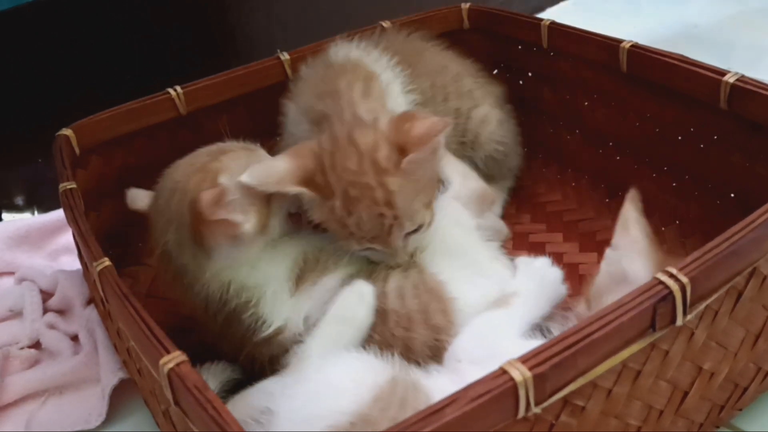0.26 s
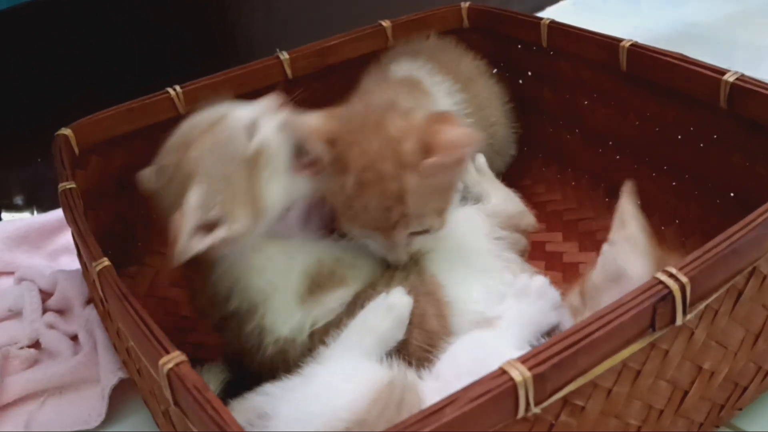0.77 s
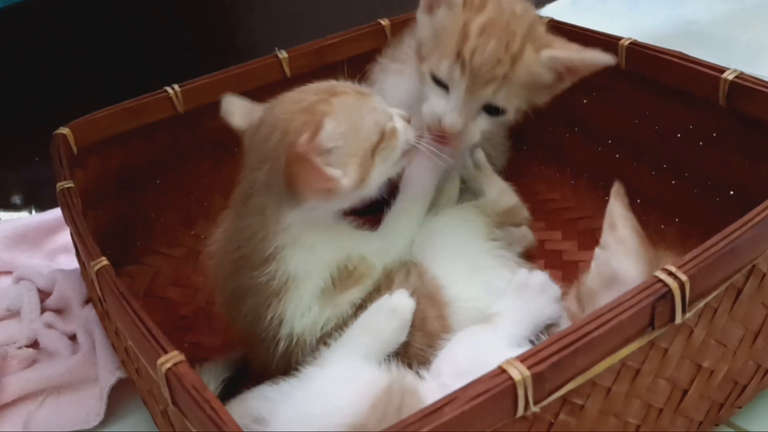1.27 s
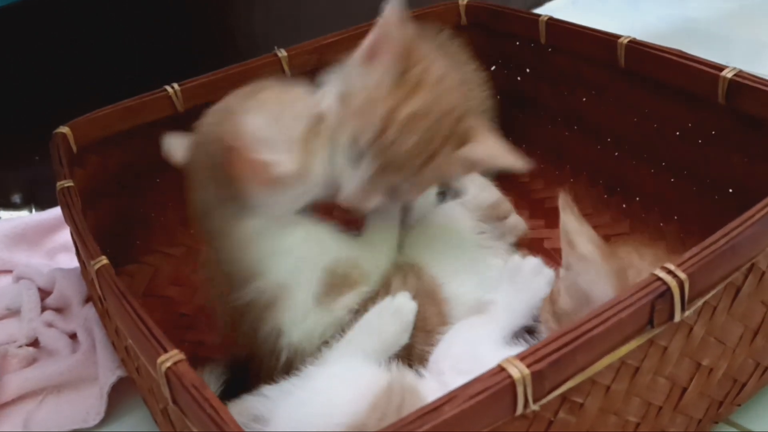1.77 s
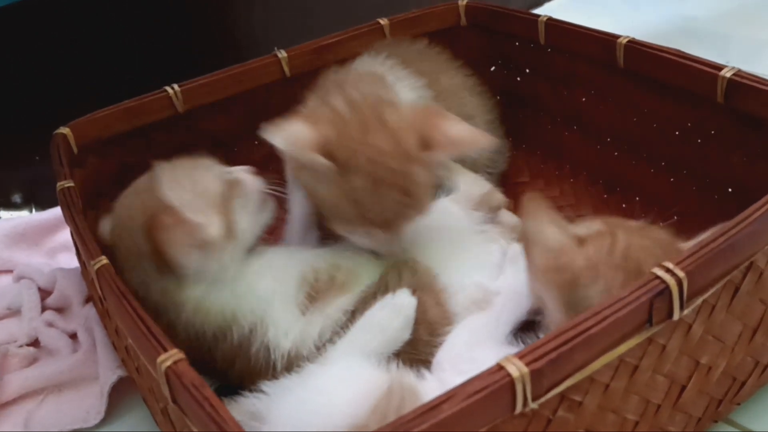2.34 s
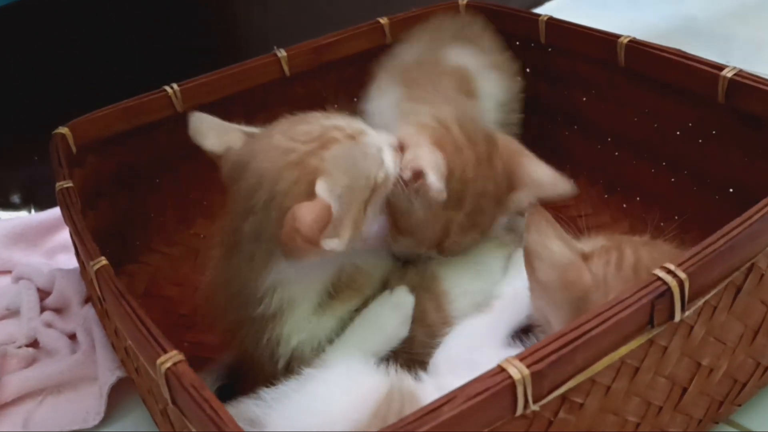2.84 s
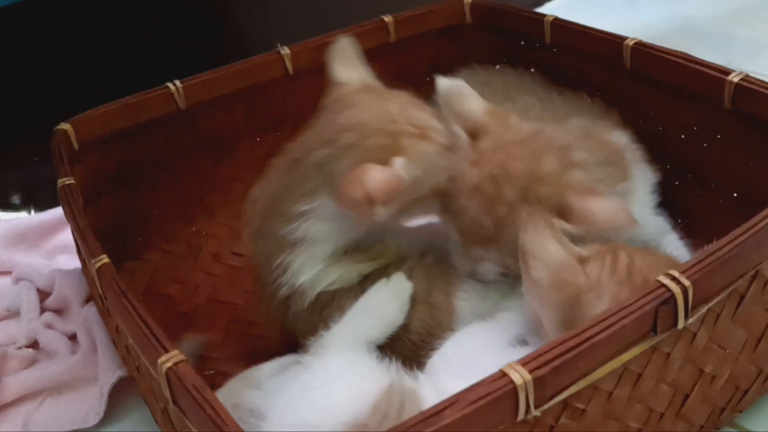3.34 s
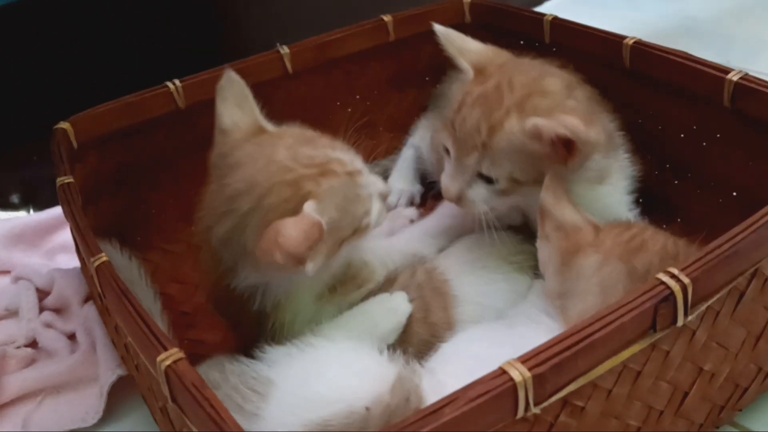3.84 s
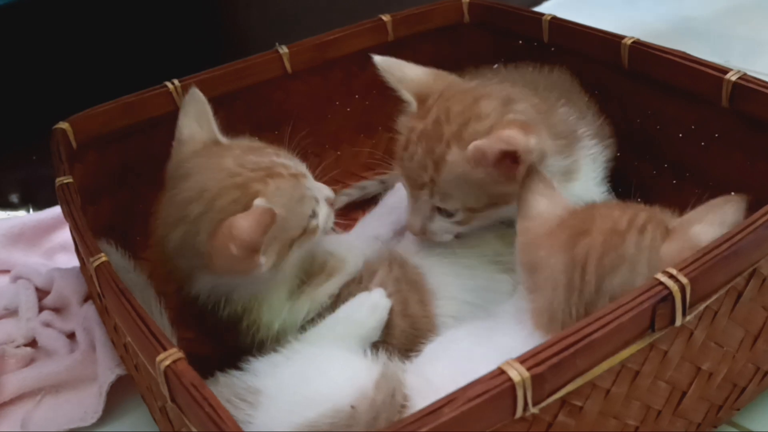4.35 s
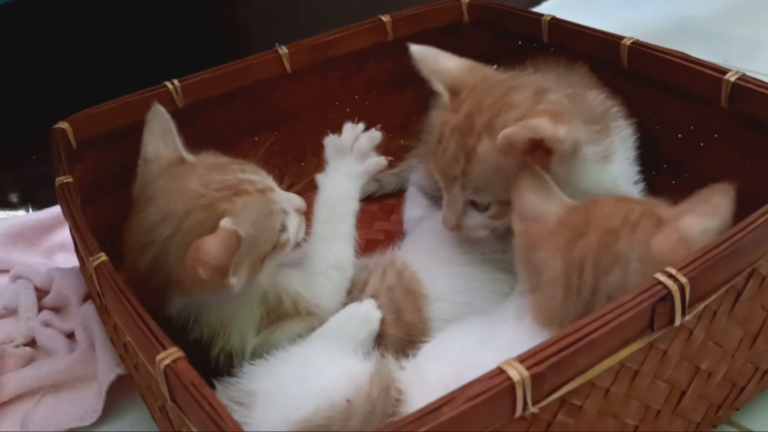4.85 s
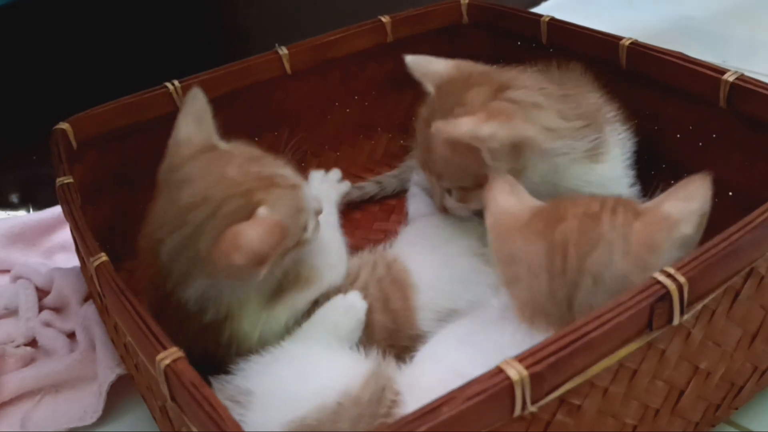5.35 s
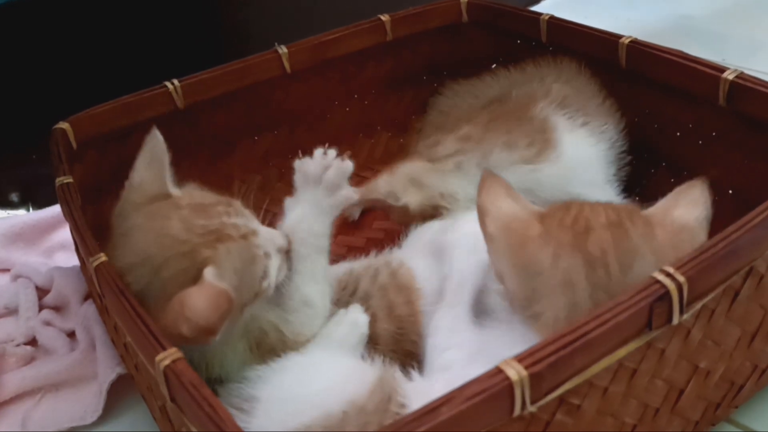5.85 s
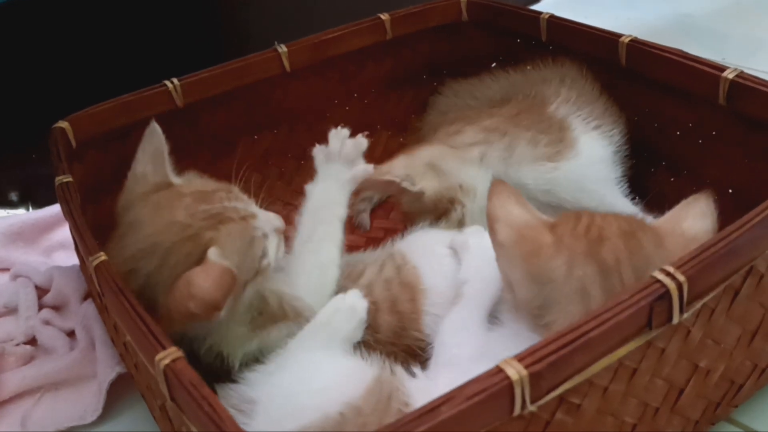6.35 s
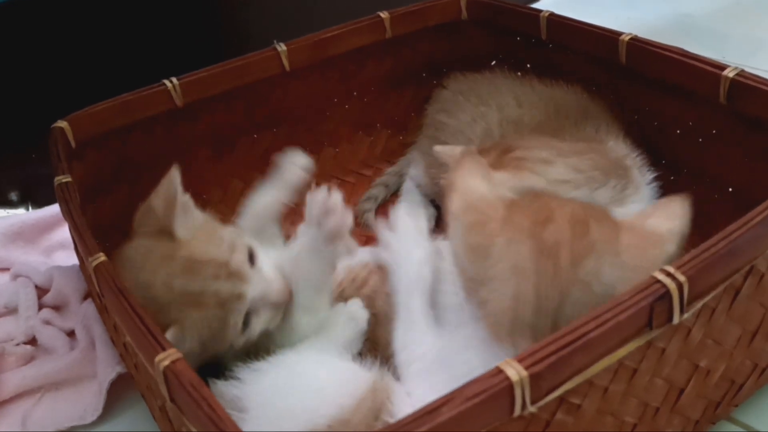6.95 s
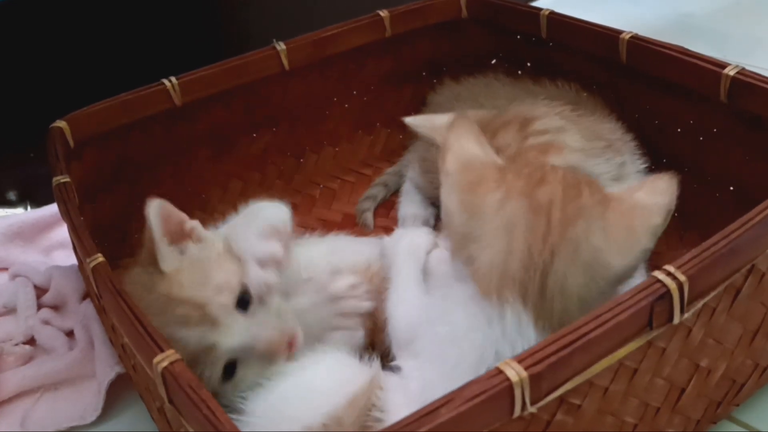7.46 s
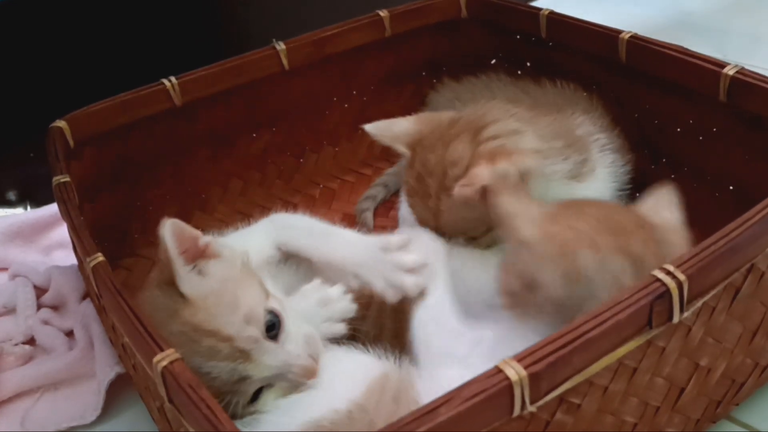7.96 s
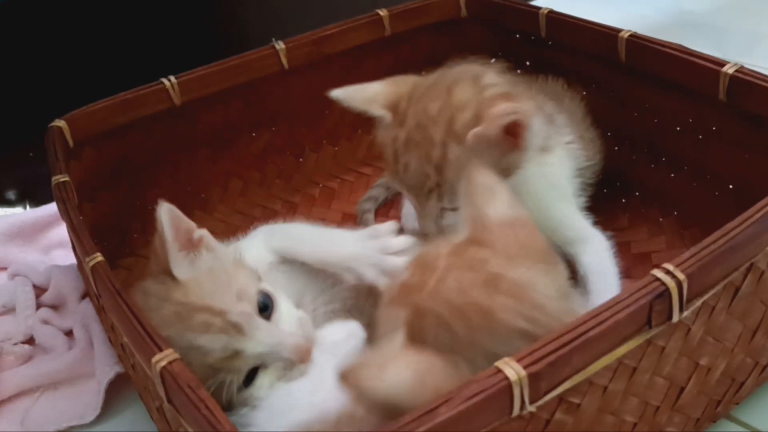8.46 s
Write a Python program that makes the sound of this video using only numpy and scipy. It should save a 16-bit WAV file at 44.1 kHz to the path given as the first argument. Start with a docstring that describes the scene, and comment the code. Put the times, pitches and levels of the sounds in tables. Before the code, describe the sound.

A close stereo indoor pickup of kittens wrestling in a wicker basket, over a steady, slightly fluttering low room rumble and a very faint thin high whine on the right. At about 0.25-0.35 s a small crackle of claws on weave is heard with a light scrape. Faint ticks come near 1.1 s, then a bright, hard snap at 1.86 s, followed by scattered clicks and scratchy drags from 2 to 2.6 s. At 3.1 s comes the loudest event, a tight cluster of sharp cracks with a soft woody paw knock, trailing into small ticks by 3.3 s. It then quiets, with faint clicks around 4.3, 5.4 and 5.8 s. A denser dry crackle and scrape runs from 6.5 to 6.8 s. Light isolated ticks, soft low bumps and faint scrapes continue from 7.1 to 7.9 s, with a last small click at 8.5 s.

```python
"""Kittens in a wicker basket

Kittens wrestle in a wicker basket indoors, close to a camera with two microphone ports.
Claws snap woven strands and drag across them: noise bursts and random slips excite damped modes.
Soft knocks and low swells are decaying low notes, and the room rumbles as filtered noise.
A thin wavering sine whines almost wholly in the right port, which also rings higher than the left."""
import sys
import numpy as np
from scipy import signal
from scipy.fft import rfft, irfft, next_fast_len
from scipy.io import wavfile
from scipy.ndimage import uniform_filter1d

SR = 44100
rng = np.random.default_rng(int(sys.argv[2]) if len(sys.argv) > 2 else 0)


def wrap_up_sound(samples):
    """Save the sound to the file named by the first command line argument, as 16-bit audio."""
    columns = np.atleast_2d(samples).T
    # keep every value between -1 and 1, then stretch to whole-number steps
    tamed = np.clip(columns, -1, 1)
    steps = np.round(tamed * 32767).astype(np.int16)
    wavfile.write(sys.argv[1], SR, steps)


N = 384327


def undb(db):
    """Logarithmic level: decibels to amplitude gain."""
    return 10 ** (np.asarray(db) / 20)


def on_log(hz, table_hz, values):
    """Logarithmic frequency scale: interpolate a spectrum along it."""
    return np.interp(np.log(np.maximum(hz, 1)), np.log(table_hz), values)


def over_time(t, table):
    """Envelope by breakpoints: straight lines between (time, value) rows."""
    return np.interp(t, *np.transpose(table))


def walk(rate):
    """Random modulation: a new normal value every 1 / rate seconds, reached by a straight slew."""
    hold = int(SR / rate)
    steps = np.repeat(rng.standard_normal(N // hold + 1), hold)
    return uniform_filter1d(steps, hold)[:N]


def stroke(t, start, length, rise, fall):
    """Raised-cosine envelope: swell, hold and fade, 0 to 1; rise and fall are shares of the length."""
    progress = (t - start) / length
    ramp = np.clip(np.minimum(progress / rise, (1 - progress) / fall), 0, 1)
    return np.sin(np.pi / 2 * ramp) ** 2


def ring(force, hz, t60):
    """Damped resonance: a two-pole mode whose answer to a unit tick peaks near 1."""
    pole = np.exp(2j * np.pi * hz / SR - np.log(1000) / (t60 * SR))
    return signal.lfilter([0, pole.imag], [1, -2 * pole.real, abs(pole) ** 2], force)


BASKET_LAG_S = 0.000924


def add(out, s, sound):
    """Arrival-time difference: mix a two-port sound in at s, reaching the left port later."""
    for port, lag in enumerate((BASKET_LAG_S, 0)):
        i = int((s + lag) * SR)
        out[port, i:i + sound.shape[1]] += sound[port, :N - i]


# spectrum of the room tone: (frequency [Hz], relative spectral level [dB])
ROOM_SPECTRUM = [(20, -25), (45, -18), (72, 1), (100, -4), (135, -9.5), (168, -8), (240, -29.5), (295, -42),
                 (330, -37.5), (365, -40), (420, -42.5), (560, -51), (670, -47.5), (760, -41), (860, -49),
                 (1400, -52), (2300, -49.5), (3200, -56.5), (7000, -66.5), (16000, -63)]
# likeness of the room tone at the two ports: (frequency [Hz], share of power common to both)
ROOM_LIKENESS = [(100, 0.93), (180, 1), (400, 0.83), (2000, 0.01), (8000, 0.012)]
# deep rumble, octaves centred on 32 to 128 Hz: (time [s], level [dB])
DEEP_RUMBLE = [(0.0, -45.5), (0.05, -40), (0.719, -36.5), (0.77, -54), (0.85, -38), (3.98, -39.5),
               (4.24, -36.5), (4.29, -42.5), (4.92, -38), (5.09, -46), (5.17, -38.5), (6.48, -40),
               (7.16, -38), (7.98, -42), (8.12, -41.5), (8.15, -51.5), (8.3, -39.5), (8.71, -40)]
# upper rumble, octave centred on 256 Hz: (time [s], level against its usual one [dB])
UPPER_RUMBLE = [(0, -0.5), (2.03, 1), (2.3, 7), (2.42, 3.5), (2.52, -4.5), (3.2, 0.5), (3.4, 8),
                (3.54, -2.5), (5.33, -2), (5.94, -2), (6.229, -0.5), (7.39, -2), (7.8, -6.5), (8.71, -2)]
ROOM_DB, LEFT_LAG_S = -38, 0.0012  # usual level; delay of the common room sound at the left port


def room(swell_db=.6, flicker_db=1.2):
    """Partly coherent noise: the bass is common to both ports; each octave swells and flickers alone."""
    t = np.arange(N) / SR
    size = next_fast_len(N)
    hz = np.arange(size // 2 + 1) * SR / size
    common, left, right = rfft(rng.standard_normal((3, size)))
    share = np.clip(on_log(hz, *np.transpose(ROOM_LIKENESS)), 0, 1)
    late = np.exp(-2j * np.pi * hz * LEFT_LAG_S)
    shared = np.sqrt(share) * common * np.array([late, np.ones_like(late)])
    separate = np.sqrt(1 - share) * np.array([left, right])
    air = (shared + separate) * undb(on_log(hz, *np.transpose(ROOM_SPECTRUM)))
    usual = irfft(air, size).std()
    out = np.zeros((2, N))
    for octave in range(5, 15):  # centred on 2 ** octave Hz, cross-fading into its neighbours
        away = np.clip(np.log2(np.maximum(hz, 32)) - octave, -1, 1)
        band = irfft(air * np.cos(np.pi * away / 2) ** 2, size)[:, :N]
        if octave == 8:
            band = band * undb(over_time(t, UPPER_RUMBLE))
        if octave < 8:
            band = band * undb(over_time(t, DEEP_RUMBLE) - ROOM_DB)
        out += band * undb(swell_db * walk(1.28) + flicker_db * walk(11))
    return out * undb(ROOM_DB) / usual


# pitch of the whine before its waver: (time [s], frequency [Hz])
WHINE_PITCH = [(0, 9710), (.6, 9715), (1.6, 9770), (2.2, 9745), (2.7, 9778), (6.5, 9778), (7.0, 9755),
               (7.5, 9825), (8.71, 9818)]
# level of the whine before its flicker: (time [s], level [dB])
WHINE_LEVEL = [(0, -76.5), (.5, -75), (1.1, -78.5), (1.7, -76.5), (2.2, -77.5), (2.7, -76.5), (3.3, -74.5),
               (3.9, -79), (4.5, -78.5), (5.2, -77.5), (5.8, -78.5), (6.3, -80.5), (6.9, -74.5), (7.4, -80),
               (8.0, -74.5), (8.4, -77), (8.71, -82.5)]
# short breaks in the whine: (start [s], length [s])
WHINE_BREAKS = [(1.215, 0.086), (3.482, 0.01), (4.751, 0.047), (5.059, 0.12), (6.035, 0.059),
                (6.343, 0.065), (7.954, 0.043)]


def whine(waver_hz=18, flicker_db=3, swell_db=2.0, left_db=-30, break_db=-35):
    """Frequency and amplitude modulation: a thin unsteady sine, almost all in the right port."""
    t = np.arange(N) / SR
    hz = over_time(t, WHINE_PITCH) + waver_hz * walk(60)
    phase = 2 * np.pi * np.cumsum(hz) / SR
    breaks = sum(stroke(t, s, length, 0.12, 0.16) for s, length in WHINE_BREAKS)
    db = over_time(t, WHINE_LEVEL) + break_db * breaks + swell_db * walk(3.8) + flicker_db * walk(50)
    return undb(db) * np.sin(phase) * undb([[left_db], [0]])


# soft low bumps, the loudest a paw on the basket floor:
# (time [s], level [dB], note [Hz], left minus right [dB])
THUMPS = [(0.298, -57, 323, 9), (1.068, -58, 414, 7), (1.27, -56.5, 337, 14.5), (1.64, -59, 325, 8),
          (1.862, -61, 430, 3), (1.117, -62, 514, -13), (1.924, -58, 517, 6), (2.05, -66, 510, 8),
          (2.166, -62.5, 510, -8), (2.298, -50.5, 643, 1), (2.336, -63, 527, 10), (1.2, -57, 259, 8),
          (2.311, -53, 253, 2), (6.103, -54, 244, 3), (3.068, -52, 774, -7), (3.085, -53, 810, -6),
          (3.1118, -33, 314, 0), (3.113, -39.5, 640, 3), (3.136, -57, 800, -2), (3.35, -60, 302, 2),
          (3.39, -57, 270, -4), (4.194, -61, 950, 3), (4.389, -65, 990, 8), (4.416, -63, 934, 10),
          (5.81, -59.5, 325, 15), (5.975, -58, 341, 21), (6.344, -60, 340, 15), (6.47, -61, 336, 12),
          (6.548, -63, 433, 2), (6.619, -56.5, 390, -7), (6.86, -61, 336, 11), (7.26, -57, 328, 16),
          (7.662, -59, 465, 3), (7.777, -55, 580, 5), (7.92, -64, 522, -12), (8.001, -59, 332, 11),
          (8.15, -60, 320, 11), (8.49, -58, 280, 3), (8.519, -64, 427, -2), (8.62, -72, 430, -3)]
THUMP_T60_S, SWELL_T60_S = 0.064, 0.099  # decay of a knock and of a soft low swell
SLOW_BELOW_HZ, SLOW_RISE_S = 345, 0.012  # soft low swells near 300 Hz start slowly


def thumps(push_s=0.00047, floor_hz=255, floor_db=-6, thud_db=-7, thud_t60_s=0.04):
    """Exponential decay: each bump's own note sounds over a common lower note and a dull broad thud."""
    out, t = np.zeros((2, N)), np.arange(SR // 4) / SR
    dull = signal.butter(2, (230, 700), "band", fs=SR, output="sos")
    for s, db, hz, pan_db in THUMPS:
        notes = np.sin(2 * np.pi * hz * t) + undb(floor_db) * np.sin(2 * np.pi * floor_hz * t)
        thud = signal.sosfilt(dull, rng.standard_normal((2, len(t))))
        thud = thud / thud.std() * undb(thud_db - 60 * t / thud_t60_s)
        if hz < SLOW_BELOW_HZ and db < -45:  # low and soft: a swell
            t60, onset = SWELL_T60_S, 2 * (1 - np.exp(-t / SLOW_RISE_S)) ** 2
        else:
            t60, onset = THUMP_T60_S, 1 - np.exp(-t / push_s)
        bump = (notes * undb(-60 * t / t60) + thud) * onset
        add(out, s, bump * undb([[db + pan_db / 2], [db - pan_db / 2]]))
    return out


# modes of strand tips, fine strands, thick strands, wall and frame, before detuning and paw damping:
# (frequency [Hz], relative level [dB], t60 [s])
TIPS = [(11900, -3, 0.003), (13500, 0, 0.002), (16400, 0, 0.0016)]
FINE = [(9100, -11, 0.003), (9000, 11.5, 0.0024), (10015, 6, 0.0052), (10680, 3.5, 0.0071)]
THICK = [(3470, -8, 0.0067), (4200, 4.5, 0.0053), (4930, -2, 0.0091), (5400, -6, 0.01), (6020, 10, 0.0045),
         (7100, 10, 0.0046)]
WALL = [(1860, -3.5, 0.018), (2050, -7.5, 0.012), (2378, -5, 0.034), (2745, -17, 0.012), (3140, 1, 0.0031)]
FRAME = [(860, 5.1, 0.017), (1100, 2.3, 0.0071), (1300, 15, 0.0055), (1400, 2.4, 0.0065)]
FAMILIES = (TIPS, FINE, THICK, WALL, FRAME)


def basket(force, modes, scatter_db, detune):
    """Modal superposition: one family rings, each spot tuned and facing a little differently."""
    out = 0
    spots = rng.standard_normal((len(modes), 3))
    for (hz, db, t60), (shift, left, right) in zip(modes, spots):
        gain = undb(db + scatter_db * np.array([[left], [right]]))
        out = out + gain * ring(force, hz * (1 + detune * shift), t60)
    return out


# strokes of claws and fur over the weave:
# (start [s], length [s], level [dB], dull part against that level [dB])
DRAGS = [(0.236, 0.14, -72, 2), (0.34, 0.21, -65.5, -17), (0.857, 0.23, -80, -9), (1.062, 0.12, -83, -17),
         (1.852, 0.097, -72, 8.5), (2.036, 0.29, -84, 6), (2.25, 0.27, -74, -0.5), (2.43, 0.14, -56, -14),
         (2.545, 0.14, -75.5, -26), (2.856, 0.36, -68.5, -23), (3.027, 0.082, -54.5, -15),
         (3.081, 0.14, -61, -3.5), (3.223, 0.11, -72.5, 2), (3.516, 0.13, -68, -29),
         (3.575, 0.16, -69, -21), (3.653, 0.08, -73, -22), (3.8, 0.073, -76, -20), (3.838, 0.31, -73, -16),
         (4.28, 0.11, -91, 12), (4.833, 0.35, -86, 5.5), (5.327, 0.25, -79, -22), (5.791, 0.044, -80.5, 26),
         (6.401, 0.085, -90, 18), (6.532, 0.11, -62.5, 3.5), (6.615, 0.11, -70.5, -1.5),
         (6.716, 0.061, -78, -19), (6.797, 0.1, -70.5, -32), (7.12, 0.34, -73.5, -10),
         (7.652, 0.064, -65, -27), (7.687, 0.15, -67, -42), (8.37, 0.15, -76, -22)]
DRAG_RISE, DRAG_FALL = 0.22, 0.55  # shares of a stroke spent swelling and fading


def drags(grains_per_s=2500, grain_db=1.0, flutter_db=3, tips_db=-14, thick_db=1, frame_db=-2, left_db=-2):
    """Stick-slip friction: dense uneven slips ring the paw-damped basket; each part flutters alone."""
    t = np.arange(N) / SR
    level, dull = np.zeros(N), np.zeros(N)
    for s, length, db, dull_db in DRAGS:
        pressure = stroke(t, s, length, DRAG_RISE, DRAG_FALL)
        level += pressure * undb(db)
        dull += pressure * undb(db + dull_db)
    times = rng.random((2, N)) < grains_per_s / SR
    sizes = undb(np.minimum(grain_db, 4) * rng.exponential(size=(2, N))) * rng.standard_normal((2, N))
    slips = np.diff(times * sizes, prepend=0)
    parts = []
    for modes in FAMILIES:
        damped = [(hz, db, t60 / 2) for hz, db, t60 in modes]  # the paw halves the decay
        part = basket(slips, damped, 0, 0)
        parts.append(part / part.std() * undb(flutter_db * walk(60)))
    tips, fine, thick, wall, frame = parts
    bright = level * (fine + undb(tips_db) * tips)
    middle = undb(thick_db) * np.sqrt(level * dull) * thick
    low = dull * (wall + undb(frame_db) * frame)
    return (bright + middle + low) * undb([[left_db], [0]])


TAIL_DB, TAIL_T60_S, TAIL_GRAINS_PER_S = -15.5, 0.13, 2500  # rustle after every snap


def rustle(t, settle_s):
    """Sparse impulse noise: decaying random grains as weave and room settle."""
    grains = (rng.random(len(t)) < TAIL_GRAINS_PER_S / SR) * np.sqrt(SR / TAIL_GRAINS_PER_S)
    tail = rng.standard_normal((2, len(t))) * grains * np.exp(-np.log(1000) * t / TAIL_T60_S)
    return undb(TAIL_DB) * tail * (1 - np.exp(-t / settle_s))


def push(force, size):
    """Inertia: heavier parts feel the crack as a slower push, averaged over size samples."""
    return uniform_filter1d(np.diff(force, prepend=0), size)


def peak_one(x):
    """Peak normalisation: scale the largest excursion to 1."""
    return x / np.abs(x).max()


RASP_DB, RASP_T60_S = -7.5, 0.018  # the settling weave keeps nudging the caught spot


def own_note(t, hz, t60, crack_s, tail):
    """Local resonance: the caught spot sounds a decaying note, with a rasp excited by the rustle."""
    note = np.sin(2 * np.pi * hz * t) * (1 - np.exp(-t / crack_s)) ** 2 * undb(-60 * t / t60)
    return peak_one(note) + undb(RASP_DB) * peak_one(ring(tail, hz, RASP_T60_S))


# claw snaps: (time [s], relative levels of tips, fine strands, thick strands, wall, frame [dB],
#  own notes of strand, wall patch, frame bar [Hz], left minus right [dB], crack decay time [ms])
SNAPS = [(0.234, -59, -63, -70, -53, -62, 4730, 1650, 1500, 10, 1.4),
         (0.254, -59, -55, -51, -38.5, -59, 4200, 1960, 1080, 8, 1.4),
         (0.268, -60, -62, -47, -42, -61, 5000, 1890, 1210, 6, 1.1),
         (0.2756, -63, -51, -53, -52, -49, 4870, 3340, 1230, 3, 0.65),
         (0.2834, -63, -56, -57, -54, -48, 4000, 3330, 1250, 3, 0.95),
         (0.296, -62, -50, -50, -40.5, -40, 4150, 1930, 1080, 6, 1.6),
         (0.3045, -63, -54, -52, -48, -51, 4100, 2280, 1300, 2, 1.3),
         (0.311, -63, -54, -50, -47, -52, 4900, 2250, 1020, 2, 1.3),
         (0.3178, -57, -50, -52, -47, -57, 4000, 2140, 1180, 2, 1.2),
         (0.337, -65, -55, -61, -52, -66, 4100, 2150, 1100, 4, 1.3),
         (1.0817, -65, -47.5, -73, -72, -78, 4100, 2000, 1460, -15, 0.54),
         (1.111, -54, -57, -73, -75, -66, 4200, 2650, 850, -6, 0.93),
         (1.1254, -71, -53, -73, -70, -70, 4010, 1690, 880, -15, 2.2),
         (1.8632, -27, -33, -31.5, -34.5, -38.5, 4600, 1710, 1270, 2.5, 1.7),
         (1.866, -38, -44, -44, -40.5, -37, 4650, 2300, 940, 9.5, 0.7),
         (1.9266, -46, -43, -61, -61, -60, 7490, 2700, 1260, -20, 0.93),
         (1.934, -56, -60, -54, -66, -68, 5700, 2800, 1240, -8, 1.2),
         (2.035, -62, -58, -53, -68, -64, 4800, 2470, 1170, -5, 0.96),
         (2.059, -61, -42, -50, -55, -73, 4650, 2390, 1500, -12, 1),
         (2.0833, -53, -49, -50.5, -60, -73, 6000, 2420, 1500, -8, 0.98),
         (2.109, -62, -50, -60, -67, -68, 5590, 2830, 1010, -10, 1),
         (2.173, -54, -41, -43.5, -52, -68, 4780, 1630, 850, -7, 1.4),
         (2.257, -70, -64, -52, -56, -78, 7400, 1800, 850, -1, 1.1),
         (2.2902, -52, -41.5, -43, -61, -69, 5200, 2800, 1250, -4, 1.3),
         (2.342, -54, -46, -46.5, -52, -66, 7350, 1830, 1450, -7, 1.1),
         (2.345, -48, -44, -50, -47, -66, 5300, 1860, 1500, 3, 1.5),
         (2.393, -54, -45, -43, -53, -66, 5300, 1730, 850, 1, 0.53),
         (2.48, -38, -55, -46, -59, -72, 4700, 2100, 1370, -9, 1.5),
         (2.51, -38, -58, -51, -67, -73, 5960, 2670, 850, -16, 1.3),
         (3.0922, -39, -50, -63, -78, -48, 6290, 1830, 830, -12, 1.2),
         (3.0985, -48, -46, -54, -62, -60, 6000, 2400, 1100, -8, 0.7),
         (3.1086, -22.5, -27.5, -34, -31, -30, 5800, 2340, 1106, 7.5, 0.84),
         (3.1126, -23, -31, -24.5, -36.5, -32, 6020, 3430, 1060, -7, 0.92),
         (3.1265, -35, -40, -38, -43, -56, 4700, 3300, 850, 10, 0.76),
         (3.1313, -44, -50, -29, -42, -56, 4980, 2600, 1100, 3, 0.82),
         (3.239, -62, -49, -46, -49, -70, 7540, 2400, 1380, 5, 1.9),
         (3.2462, -62, -54, -57, -45.5, -68, 4600, 2420, 1500, 6, 1.1),
         (3.253, -52, -55, -48, -52, -68, 4660, 3260, 1400, 7, 1.4),
         (3.257, -51, -39.5, -50, -48.5, -73, 4620, 2800, 1170, 8, 1.3),
         (3.2755, -60, -50, -40, -53, -61, 7400, 2780, 1340, -1, 1),
         (3.2775, -47, -35.5, -43, -45, -55, 4620, 2780, 1350, 10.5, 2),
         (3.294, -61, -62, -46, -57, -71, 5570, 2440, 850, -5, 1.2),
         (4.296, -66, -56, -57, -52, -68, 3930, 2240, 850, 4, 0.84),
         (4.308, -44, -58, -50, -63, -52, 7500, 2170, 960, -1, 1.2),
         (4.36, -67, -56, -55, -58, -78, 5500, 2910, 850, -2, 1.2),
         (5.371, -58, -53, -51, -57, -68, 7100, 2300, 880, -1, 1),
         (5.401, -59, -58, -61, -64, -78, 6330, 2330, 1430, -2, 1.2),
         (5.412, -58, -56, -62, -66, -75, 6300, 2300, 1400, 0, 1),
         (5.528, -55, -46.5, -51, -62, -78, 4020, 2620, 1010, 2, 1.5),
         (5.543, -61, -48, -45, -52, -57, 4070, 2610, 860, 2, 1.4),
         (5.584, -68, -64, -54, -63, -72, 4050, 2000, 1400, 3, 1.5),
         (5.771, -58, -60, -60, -66, -75, 5500, 2500, 1400, -2, 0.8),
         (5.798, -54, -44, -40, -43, -63, 4900, 2380, 1430, -2, 1.05),
         (5.817, -56, -59, -50, -47.5, -48, 6070, 2260, 1010, 14, 1.5),
         (6.435, -65, -66, -57, -54.5, -65, 3820, 1900, 1300, 7, 1),
         (6.541, -55, -44, -54, -52, -53, 7700, 2370, 1450, 22, 1.9),
         (6.549, -72, -51, -46, -51, -64, 5480, 2520, 1400, -6, 0.86),
         (6.558, -62, -56, -52, -57, -61, 5500, 2470, 1300, 1, 1.2),
         (6.5648, -46, -39.5, -36, -36, -58, 5750, 2510, 1160, 5.5, 0.94),
         (6.571, -42, -36, -32, -38, -37.5, 5630, 3070, 1190, 5.5, 1.5),
         (6.5777, -47, -34, -49, -40, -63, 3960, 2440, 1130, 7, 0.96),
         (6.5924, -48, -49, -47, -41, -49, 5660, 2520, 1160, 12, 1),
         (6.611, -70, -66, -56, -54, -60, 5900, 2480, 1320, 2, 1),
         (6.622, -55, -45, -51, -61, -59, 7100, 2330, 1180, 6, 0.9),
         (6.635, -56, -41.5, -34.5, -44.5, -78, 6680, 2360, 1240, -1, 2.5),
         (6.655, -70, -54, -47, -53, -78, 6020, 2250, 850, 2, 1),
         (6.72, -64, -54, -44, -68, -78, 6900, 2340, 850, -13, 0.79),
         (6.723, -52, -37.5, -37.5, -52, -71, 5950, 2320, 850, -3, 0.99),
         (6.742, -50, -44, -42, -70, -78, 6400, 3150, 1200, -2, 1.1),
         (6.824, -62, -44.5, -69, -71, -78, 7600, 2160, 850, 0, 1.5),
         (6.814, -58, -39, -75, -71, -78, 5350, 2160, 850, 2, 0.96),
         (7.149, -51, -55, -44.5, -49, -76, 5350, 2330, 1290, 2, 1.3),
         (7.2614, -63, -52, -60, -60, -71, 6100, 1990, 1360, 1, 1.4),
         (7.274, -62, -59, -66, -68, -75, 6100, 2000, 1360, 0, 1),
         (7.294, -68, -61, -67, -57, -70, 4840, 2380, 850, 7, 1.2),
         (7.336, -56, -50, -56, -57, -77, 6900, 2780, 1500, 1, 1.2),
         (7.352, -54, -46.5, -56, -63, -62, 4000, 2840, 1360, 7, 1.3),
         (7.444, -52, -47, -50.5, -58, -61, 5660, 2840, 1280, 8, 1.8),
         (7.666, -49, -40.5, -41.5, -53, -63, 5500, 2850, 1410, 1, 1.8),
         (7.778, -61, -45, -55, -59, -67, 7000, 2400, 1480, -3, 1.5),
         (7.8193, -51, -41, -43, -49.5, -54, 4350, 3160, 1370, -2, 1.9),
         (7.823, -58, -52, -55, -48, -56, 5540, 2380, 1230, 3, 1.2),
         (7.834, -62, -59, -56, -60, -66, 5600, 2200, 1400, -2, 1.3),
         (7.872, -68, -60, -68, -61, -66, 4000, 2120, 1500, 0, 1.1),
         (7.925, -59, -44.5, -56, -55, -61, 4000, 2150, 1400, -4, 2),
         (8.496, -58, -57, -55, -53, -70, 6980, 2520, 1460, -3, 0.92)]
# notes of the caught strand, wall patch and frame bar: (level against the shared ring [dB], t60 [s])
OWN_NOTES = [(-6, 0.01), (0, 0.015), (0.5, 0.02)]
# how far tips, fine, thick, wall and frame follow the claw's side: (share) for each
PAN_SHARES = (0.3, 0.63, 1, 0.99, 0.64)


def snaps(rise=1.13, settle_s=0.0018, low_hz=780, bare_db=-6):
    """Impulsive excitation: a crack of a millisecond or so, then a rustle, sets the basket's modes ringing."""
    out, t = np.zeros((2, N)), np.arange(SR // 7) / SR
    push_sizes = (1, 1, 2, 7, 14)  # samples, from tips to frame
    for row in SNAPS:
        s, family_db, own_hz, pan_db, crack_s = row[0], row[1:6], row[6:9], row[9], row[10] / 1000
        crack_shape = (1 - np.exp(-t / (rise * crack_s))) * np.exp(-t / crack_s)
        crack = 3 * rng.standard_normal(len(t)) * crack_shape
        tail = rustle(t, settle_s)
        rings = [peak_one(basket(push(crack + tail, size), modes, 2, .03))
                 for size, modes in zip(push_sizes, FAMILIES)]
        # the crack itself is heard with the thick strands
        rings[2] = rings[2] + undb(bare_db) * peak_one(push(crack, push_sizes[2]))
        # thick strands, wall and frame each gain the note of the caught spot
        for k, hz, (db, t60) in zip((2, 3, 4), own_hz, OWN_NOTES):
            rings[k] = (rings[k] + undb(db) * own_note(t, hz, t60, crack_s, tail)) / 2
        sound = 0
        for db, share, family in zip(family_db, PAN_SHARES, rings):
            side_db = share * pan_db / 2
            sound = sound + undb([[db + side_db], [db - side_db]]) * family
        add(out, s, sound)
    # high-pass: the snaps carry little bass
    return signal.sosfilt(signal.butter(3, low_hz, "high", fs=SR, output="sos"), out)


def scene():
    """Linear superposition: room, whine and basket sounds sum at the two ports."""
    return room() + whine() + thumps() + drags() + snaps()


# colour of the microphone ports: (frequency [Hz], left gain [dB], right gain [dB])
PORTS = [(212, 1, 2), (307, 4, 2), (620, -0.5, -0.5), (2380, 1.5, -1.5), (4900, 2, 3.5), (7000, -1, 3),
         (8200, 4.5, -1), (9840, -11.5, 11.5), (10740, -9, 1.5), (14600, -17.5, -9)]
TOP_HZ = 15800  # recorder's upper limit


def record(dry):
    """Minimum-phase filtering: cepstra give each port's causal response; a low-pass cuts the top."""
    hz, *port_db = np.transpose(PORTS)
    grid = np.arange(1025) * SR / 2048
    cepstrum = irfft(np.log(undb([on_log(grid, hz, db) for db in port_db])))
    # fold the cepstrum onto positive time, which makes the response causal
    cepstrum[:, 1:1024] *= 2
    cepstrum[:, 1025:] = 0
    response = irfft(np.exp(rfft(cepstrum)))
    coloured = signal.fftconvolve(dry, response, axes=1)[:, :N]
    return signal.sosfilt(signal.ellip(10, .2, 60, TOP_HZ, fs=SR, output="sos"), coloured)


dry = scene()
out = record(dry)
wrap_up_sound(out)
```